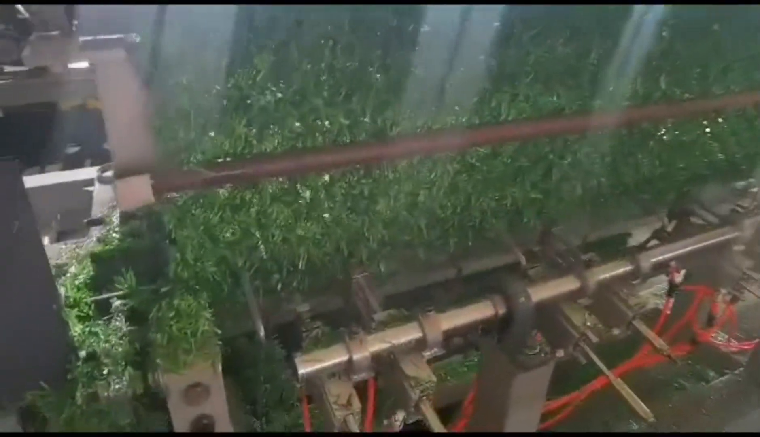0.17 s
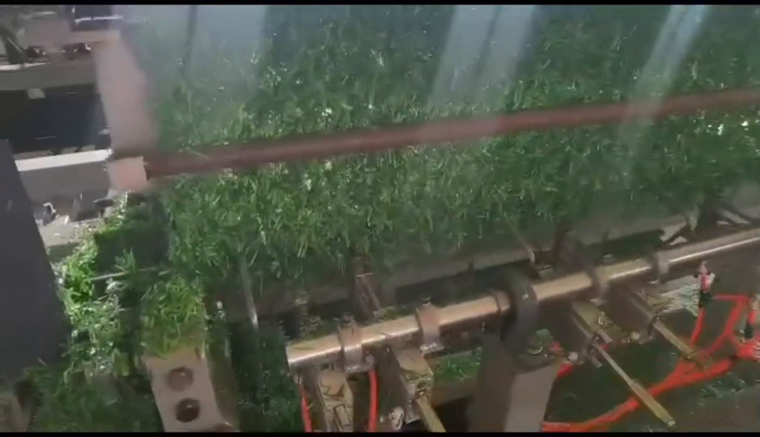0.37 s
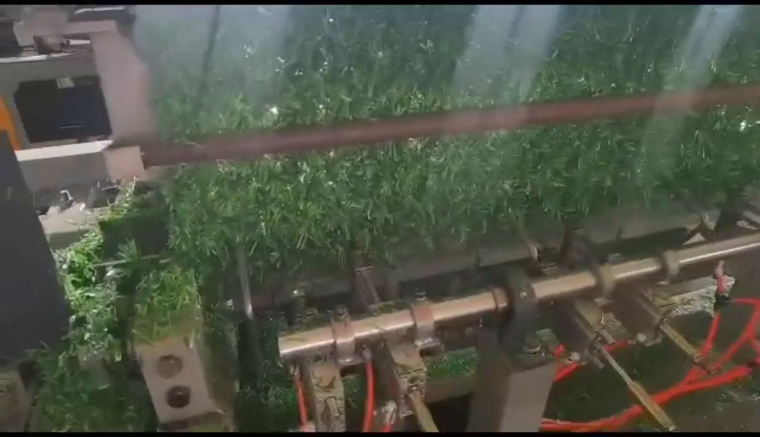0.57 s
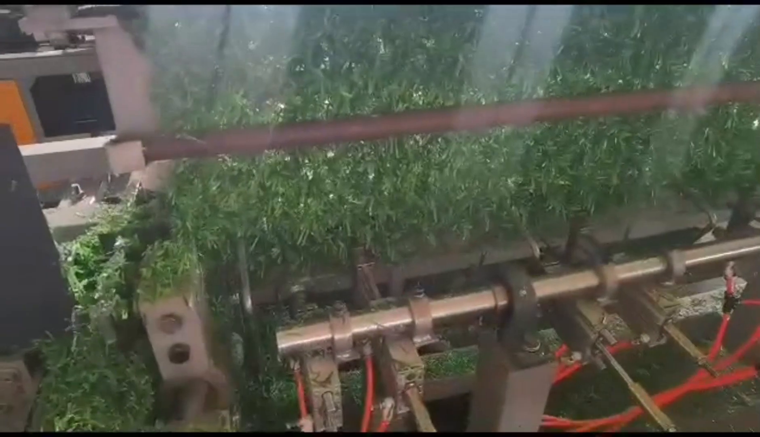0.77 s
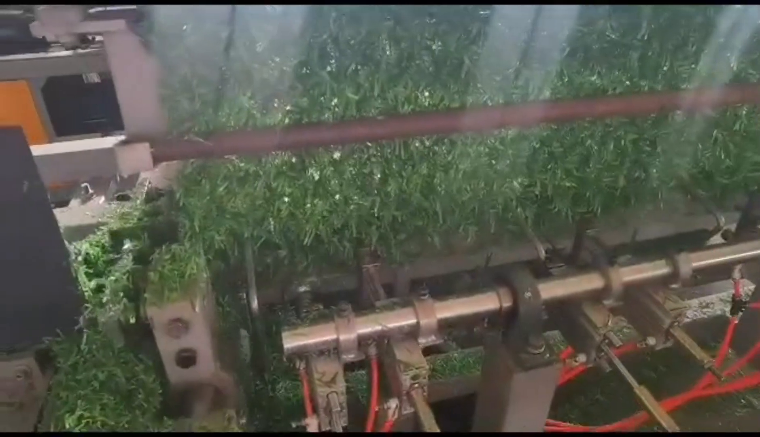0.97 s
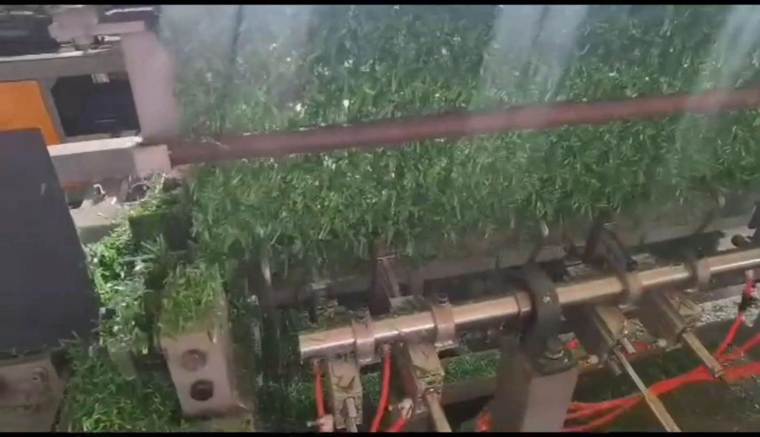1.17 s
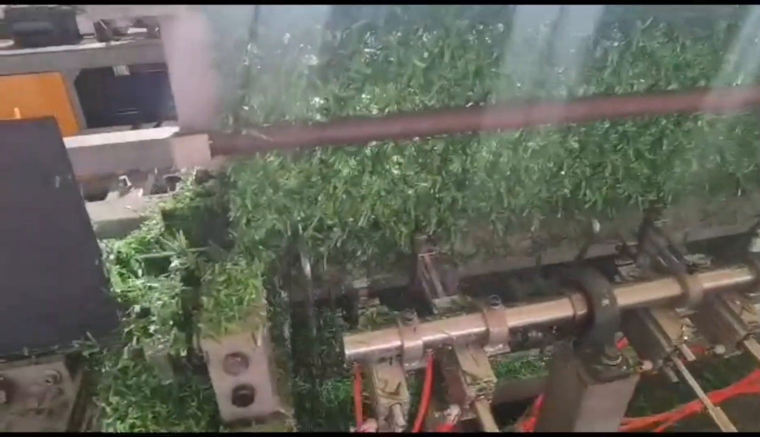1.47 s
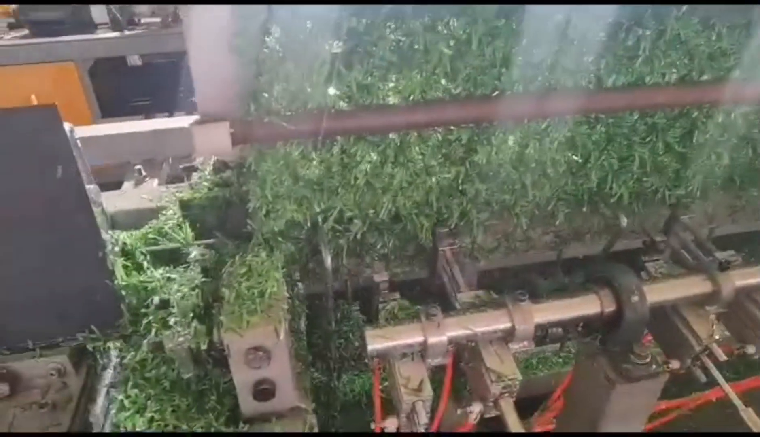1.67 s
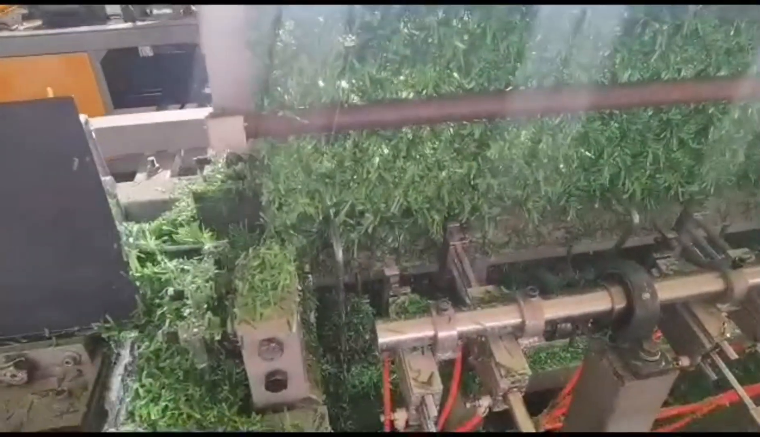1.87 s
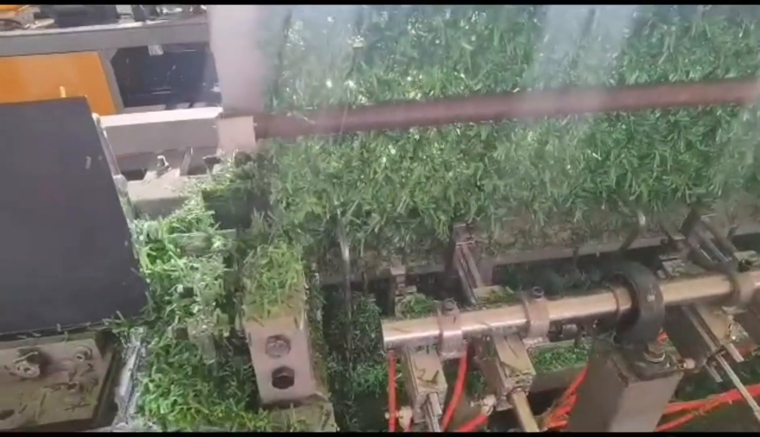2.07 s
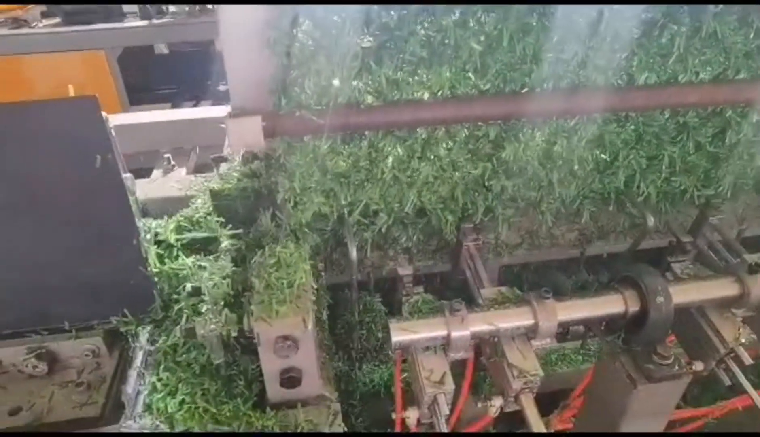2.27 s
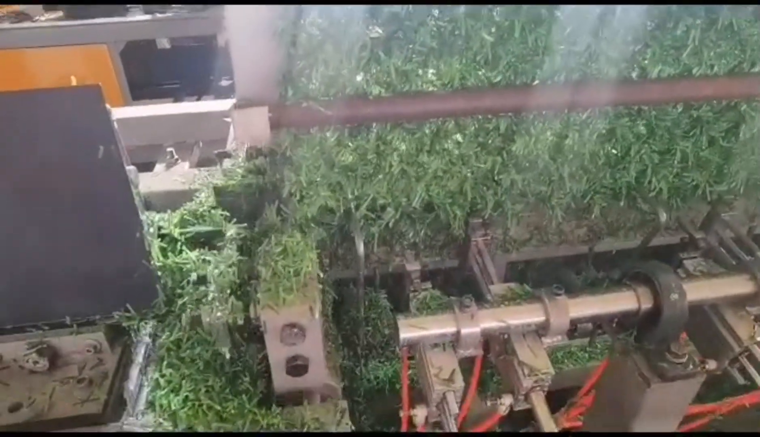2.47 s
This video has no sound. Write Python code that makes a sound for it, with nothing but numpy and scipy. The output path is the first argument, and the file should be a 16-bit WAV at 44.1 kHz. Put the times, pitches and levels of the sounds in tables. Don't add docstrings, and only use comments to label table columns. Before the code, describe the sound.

A wire mesh machine rattles and knocks in a ringing hall over motor whine, leaking air and distant hum. Air vents softly from 0.1 s; strong clunks fall near 0.45 and 0.6. A ram judders and scrapes at 0.7, with knocks until 0.95. Sharp air bursts hit at 1.03-1.13, then fade, with a faint knock at 1.33. Clatter and clangs return from 2.15 to the end. Phone sound, thin bass, dull treble.

```python
import sys
import numpy as np
from scipy import signal
from scipy.fft import rfft, irfft, next_fast_len
from scipy.io import wavfile
from scipy.ndimage import uniform_filter1d, map_coordinates

SR = 44100
rng = np.random.default_rng(int(sys.argv[2]) if len(sys.argv) > 2 else 0)


def dump_mix(stems):
    frames = np.atleast_2d(stems).T
    limited = np.clip(frames, -1, 1)
    pcm = np.round(limited * 32767).astype(np.int16)
    wavfile.write(sys.argv[1], SR, pcm)


def nominal_scale(level):
    x = np.asarray(level, float) / 20
    return 10 ** x


N = 115101
FLUTTER_DB = 2


def unit(x):
    return x / np.sqrt(np.mean(x ** 2) + 1e-20)


def along(points, hz):
    f, v = np.transpose(points)
    return np.interp(np.log(hz + 1), np.log(f + 1), v)


def wobble(knots_per_s):
    knots = rng.standard_normal(int(N * knots_per_s / SR) + 4)
    return map_coordinates(knots, [np.arange(N) * knots_per_s / SR])


def filtered(x, response):
    m = next_fast_len(N + SR // 2)
    return irfft(rfft(x, m) * response(np.fft.rfftfreq(m, 1 / SR)), m)[..., :N]


def body(peaks):
    def response(f):
        total = 0
        for k, (center_hz, width_hz, db) in enumerate(peaks):
            damping = 1j * f * width_hz
            total = total + (-1) ** k * nominal_scale(db) * damping / (center_hz ** 2 - f * f + damping)
        return total
    return response


def shape(start_s, rise_s, hold_s, t60_s):
    t = np.arange(N) / SR - start_s
    release = nominal_scale(-60 * np.clip(t - rise_s - hold_s, 0, None) / t60_s)
    return np.clip(t / rise_s, 0, 1) * release


def spread(pair):
    # (frequency [Hz], side over mid [dB])
    side_over_mid = [(60, -12), (180, -18), (550, -10), (1200, 1), (2500, -0.5), (4970, 0.5), (15000, -1)]
    mid, side = filtered(pair, lambda f: np.array([f * 0 + 1, nominal_scale(along(side_over_mid, f))]))
    return np.array([mid + side, mid - side])


def rush(spectrum, patchy_db):
    z = signal.stft(rng.standard_normal((2, N)), nperseg=512)[2]
    patches = rng.standard_normal(z.shape[1:])
    patches = uniform_filter1d(uniform_filter1d(patches, 5, 0), 8, 1)
    pair = signal.istft(z * nominal_scale(patchy_db * unit(patches)), nperseg=512)[1][:, :N]
    return spread(unit(filtered(pair, lambda f: nominal_scale(along(spectrum, f)))))


def tone(hz):
    cycles = np.cumsum(hz + hz * 0.0012 * wobble(16)) / SR
    return np.sin(2 * np.pi * (cycles + rng.random((2, 1))))


def motors():
    # (frequency [Hz], level [dB rms])
    steady = [(242, -47.5), (990.5, -49.5), (1658, -44), (2250, -50.5), (3241, -48)]
    # (frequency [Hz], level [dB rms])
    beating = [(1055, -43.5)]
    # (time [s], level [dB rms])
    pump = [(0, -49), (.15, -43), (1.1, -41), (1.3, -52.5), (2.1, -50), (2.3, -49)]
    beat_hz, beat_depth, beat_peak_s, pump_hz = 3, 0.55, 1.65, 2107
    t = np.arange(N) / SR
    beat = 1 + beat_depth * np.cos(2 * np.pi * beat_hz * (t - beat_peak_s))
    whine = beat * sum(nominal_scale(db) * tone(hz) for hz, db in beating)
    whine = whine + sum(nominal_scale(db) * tone(hz) for hz, db in steady)
    pump_db = np.interp(t, *np.transpose(pump)) + FLUTTER_DB * wobble(11.9)
    return np.sqrt(2) * spread(whine + nominal_scale(pump_db) * tone(pump_hz))


def air_leak():
    # (frequency [Hz], density [dB per Hz])
    jet_spectrum = [(880, -16.5), (1500, -17), (2180, -5), (2840, -10), (3350, -6), (3730, -10), (5110, -9),
                    (6730, -2.5), (7500, -6.5), (15600, -19)]
    # (frequency [Hz], width [Hz], level [dB])
    nozzle = [(5700, 55, 0), (5970, 72, 2), (6330, 62, 0.5), (6496, 64, 2.5), (7100, 45, 4), (8640, 370, 0)]
    # (time [s], level [dB])
    pressure = [(0, 7), (.9, 6.5), (1.4, 2), (2.1, 2)]
    jet = unit(filtered(rush(jet_spectrum, patchy_db=1.5), lambda f: 1 + np.abs(body(nozzle)(f))))
    drift_db = np.interp(np.arange(N) / SR, *np.transpose(pressure))
    return nominal_scale(-29 + drift_db + 0.88 * wobble(8.34)) * jet


def far_machines():
    # (frequency [Hz], density [dB per Hz])
    hum_spectrum = [(24, -66), (45, -27.5), (152, -5), (209, -11.5), (232, -7.5), (401, -20), (818, -21),
                    (1030, -9), (1500, -44), (1950, -66), (3300, -120)]
    return nominal_scale(-40) * rush(hum_spectrum, patchy_db=2.0)


def carriage():
    # (time [s], effort [dB], load on the frame over effort [dB])
    travel = [
        [(0.0, -34.5, 1), (0.09, -45, 10.5), (0.14, -29.5, 1), (0.28, -33, 3.5), (0.31, -23.5, 4.5),
         (0.432, -26.5, 0), (0.466, -30.5, 2.5), (0.668, -33.5, 8), (0.692, -35, 2)],
        [(0.692, -26.5, 12.5), (0.734, -21.5, 7), (0.776, -35, 8), (1.03, -40, 0.5), (1.054, -35, -1),
         (1.354, -42.5, 8.5), (1.39, -44, -3), (1.45, -56.5, 3)],
        [(2.14, -45, 0), (2.15, -33, 2), (2.19, -31.5, 9), (2.243, -31, 6), (2.258, -28.5, -9),
         (2.3, -29, -0.5), (2.449, -34, 7), (2.599, -37, 5), (2.61, -41, 11)],
    ]
    # (frequency [Hz], width [Hz], level [dB])
    rail_modes = [(427, 78, -2), (690, 273, -0.5), (890, 93, 4.5), (1067, 52, 3), (1350, 134, 3),
                  (1670, 230, -1.5), (2160, 470, -3)]
    # (frequency [Hz], width [Hz], level [dB])
    frame_modes = [(88.7, 24.5, -4.5), (119.7, 11, -3), (162.5, 26, -2), (235, 50, -1.5), (359.6, 98, -6)]
    rattles_per_s, rattle_spread_db, rumble_db = 1500, 5, -3
    damping_db_per_db, damped_above_hz = 0.52, 1050
    t = np.arange(N) / SR
    effort, load = 0, 0
    for rows in travel:
        s, db, over_db = np.transpose(rows)
        effort = effort + nominal_scale(np.interp(t, s, db, left=-120, right=-120))
        load = load + nominal_scale(np.interp(t, s, db + over_db, left=-120, right=-120))
    chance, sign = rng.random((2, 2, N))
    taps = (chance < rattles_per_s / SR) * np.sign(sign - 0.5)
    taps = taps * nominal_scale(rattle_spread_db * rng.standard_normal((2, N)))
    rails = unit(filtered(taps, body(rail_modes)))
    bright = filtered(rails, lambda f: 1 / (1 + (damped_above_hz / (f + 1)) ** 4))
    rails = rails + bright * ((effort / load) ** damping_db_per_db - 1)
    frame = filtered(taps, body(frame_modes))
    frame = unit(filtered(frame, lambda f: 1 / (1 + 1j * f / 600)))
    shake = load * nominal_scale(rumble_db + FLUTTER_DB * wobble(30.26))
    return spread(effort * rails + shake * frame)


def valves():
    # (time [s], rise [s], hold [s], t60 [s], level [dB])
    exhausts = [
        (0.103, 0.042, 0.14, 0.72, -19.5),
        (1.021, 0.023, 0.029, 0.45, -21.5),
        (1.13, 0.027, 0.057, 0.38, -27),
    ]
    # (time [s], level [dB])
    puffs = [
        (0.112, -24),
        (0.315, -32),
        (0.391, -21),
        (0.69, -22),
        (1.043, -18.5),
        (1.064, -19),
        (1.09, -19.5),
        (2.252, -20),
    ]
    # (time [s], level [dB])
    ticks = [
        (.1106, -24),
        (0.1175, -19),
        (.3925, -16),
        (0.6896, -18.5),
        (1.0263, -10),
        (1.0473, -16.5),
        (2.253, -26),
        (2.263, -27),
    ]
    # (frequency [Hz], density [dB per Hz])
    muffled = [(880, -49), (1500, -35), (2290, -8.5), (4400, -10.5), (5300, 1.5), (6500, 1), (7300, -16.5),
               (10800, -15.5), (11900, -60)]
    # (frequency [Hz], density [dB per Hz])
    open_port = [(290, -37), (500, -9), (1990, 0.5), (2370, 0.5), (4800, 0), (6220, 1.5), (8910, -5.5),
                 (10400, -11), (15600, -14.5)]
    # (frequency [Hz], density [dB per Hz])
    snap_spectrum = [(700, -4), (1500, -12), (3000, -2), (5000, 3), (8000, 3.5), (11000, -5), (15700, -2.5)]
    vents = [nominal_scale(db + 1.6 * wobble(60.4)) * shape(s, rise_s, hold_s, t60_s)
             for s, rise_s, hold_s, t60_s, db in exhausts]
    snaps = sum(nominal_scale(db) * shape(s, 0.0027, 0.0024, 0.11) for s, db in puffs)
    snaps = snaps + sum(nominal_scale(db) * shape(s, 0.0005, 0, 0.012) for s, db in ticks)
    silenced = vents[0] * rush(muffled, patchy_db=0.0)
    vented = sum(vents[1:]) * rush(open_port, patchy_db=0.5)
    return silenced + vented + snaps * rush(snap_spectrum, patchy_db=1.2)


def struck(rows, rise_s, t60_s):
    total = 0
    for s, db, hz, *glide_hz_per_s in rows:
        t = np.arange(N) / SR - s
        ring = np.sin(2 * np.pi * (hz + sum(glide_hz_per_s) * t / 2) * t)
        total = total + nominal_scale(db + FLUTTER_DB * wobble(69.56)) * shape(s, rise_s, 0, t60_s) * ring
    return total


def clamp_knocks():
    # (time [s], peak level [dB], ring frequency [Hz])
    knocks = [(0.119, -13.5, 282), (0.181, -12, 244), (0.299, -20, 252), (0.322, -17, 193),
              (0.374, -17, 227), (0.452, -6.5, 192), (0.551, -35, 240), (0.604, -7, 225),
              (0.777, -10.5, 235), (0.806, -11, 159), (0.843, -13, 180), (0.925, -10, 128),
              (0.947, -23, 156), (1.328, -22, 222), (2.149, -18.5, 407), (2.192, -10.5, 191),
              (2.233, -12.5, 230), (2.293, -16, 220), (2.455, -15.5, 350), (2.477, -19, 223),
              (2.527, -15.5, 188), (2.559, -31, 246), (2.594, -28, 348)]
    return nominal_scale(-10.5) * struck(knocks, rise_s=0.006, t60_s=0.09)


def bar_clangs():
    # (time [s], level [dB], frequency [Hz], glide [Hz/s])
    clangs = [(.315, -22, 1700, 0), (.392, -19, 1370, 0), (.42, -19, 1810, -9000), (.45, -33, 1350, 0),
              (.72, -20, 396, -2), (.735, -24, 1820, 8000), (.134, -26, 2180, 0), (.608, -25, 512, 0),
              (.69, -25.5, 2470, -2.5), (.78, -28, 3190, 0), (.815, -36, 1044, 0), (.835, -27, 3260, 0),
              (.881, -25, 1650, 0), (.9, -27, 2050, 0), (2.143, -35, 1040, 0), (2.153, -29, 2066, 0),
              (2.215, -24, 599, 3000), (2.232, -34, 1920, 0), (2.237, -33, 790, 1.5),
              (2.253, -27.5, 1370, 0), (2.268, -30, 902, 0), (2.288, -25, 751, 0), (2.293, -24, 1420, 0),
              (2.3, -36, 1650, 0), (2.35, -34, 1540, 0)]
    return struck(clangs, rise_s=0.008, t60_s=0.09)


def ram():
    # (multiple of judder rate [1], level [dB])
    orders = [(1, -9.5), (2, -1.5), (3, -15), (4, -18.5), (6, -33)]
    start_s, lag_s, judder_hz, sag_hz_per_s = 0.69, 0.0045, 113, 28
    t = np.arange(N) / SR - start_s - lag_s
    turn = 2 * np.pi * (judder_hz * t - sag_hz_per_s * t ** 2 / 2)
    buzz = sum(nominal_scale(db + 2 * wobble(60.1)) * np.sin(k * turn - np.pi / 2) for k, db in orders)
    return nominal_scale(-17) * np.sqrt(2) * shape(start_s, rise_s=0.008, hold_s=0.058, t60_s=0.04) * buzz


def guide_scrape():
    # (frequency [Hz], density [dB per Hz])
    friction = [(300, -30), (600, -9), (1900, 1), (2900, -3), (3600, -40)]
    envelope = shape(0.715, rise_s=0.022, hold_s=0.018, t60_s=0.04)
    return nominal_scale(-30) * envelope * rush(friction, patchy_db=1)


def hall(x):
    # (frequency [Hz], t60 [s])
    decay = [(100, 1.29), (1000, 1.08), (5000, 1.04), (12000, 0.47)]
    hz, t, z = signal.stft(rng.standard_normal((2, SR)), SR, nperseg=512)
    tail = signal.istft(z * nominal_scale(-60 * t / along(decay, hz)[:, None]), SR, nperseg=512)[1]
    tail = tail / np.linalg.norm(tail[0])
    delayed = np.pad(x, (600, 0))[None]
    return spread(signal.fftconvolve(delayed, tail, axes=1)[:, :N])


def scene():
    lead_s, left_db = 0.00014, 0.32
    blows = clamp_knocks() + bar_clangs() + ram()
    machine = carriage() + valves() + blows + guide_scrape()
    background = far_machines() + air_leak() + motors()
    field = machine + nominal_scale(-9.5) * hall(machine[0]) + background
    sides = np.array([[1], [-1]])
    ports = filtered(field, lambda f: np.exp(1j * np.pi * f * lead_s * sides))
    return ports * nominal_scale(left_db * sides)


def starved(x):
    # (frequency [Hz], readiness to go empty [sigma])
    holes = [(2500, -12), (3000, -2.2), (3400, -3), (3750, -.7), (4300, -4), (9800, -3), (11600, .2),
             (13500, -.4), (15300, .6)]
    masking_per_db = 0.22
    hz, t, z = signal.stft(x, SR, nperseg=1024, noverlap=768)
    power = np.abs(z).mean(axis=0) ** 2 + 1e-14
    band_db = 10 * np.log10(uniform_filter1d(power, size=24, axis=0))
    air_db = 10 * np.log10(power[90:].sum(axis=0))
    margin_db = band_db - np.median(band_db, axis=1)[:, None] - air_db + np.median(air_db)
    luck = rng.standard_normal((len(hz) // 4 + 1, len(t) // 7 + 1))
    luck = unit(luck.repeat(4, axis=0).repeat(7, axis=1)[:len(hz), :len(t)])
    kept = luck + masking_per_db * margin_db > along(holes, hz)[:, None]
    return signal.istft(z * kept, SR, nperseg=1024, noverlap=768)[1][:, :N]


def low_pass(x):
    return signal.sosfilt(signal.butter(12, 15780, fs=SR, output="sos"), x)


def record(dry):
    # (frequency [Hz], gain [dB])
    mic = [(9500, 0), (10500, -2), (11300, -7.5), (15700, -13.5)]
    heard = filtered(dry, lambda f: (1j * f / (55 + 1j * f)) ** 2 * nominal_scale(along(mic, f)))
    mix = starved(heard)
    return low_pass(mix)


dry = scene()
out = record(dry)
dump_mix(out)
```